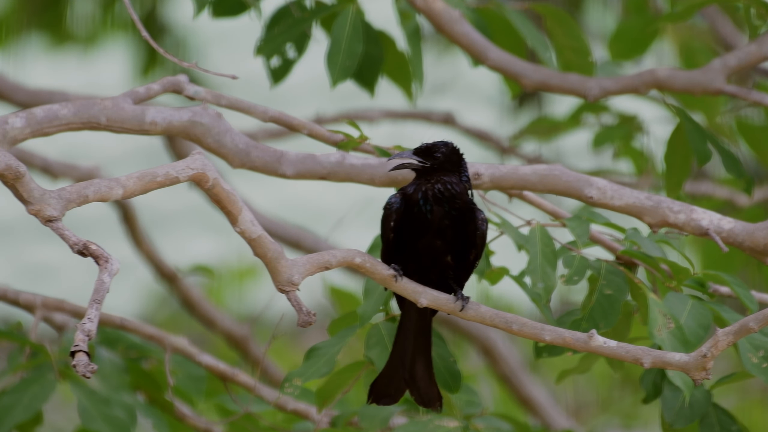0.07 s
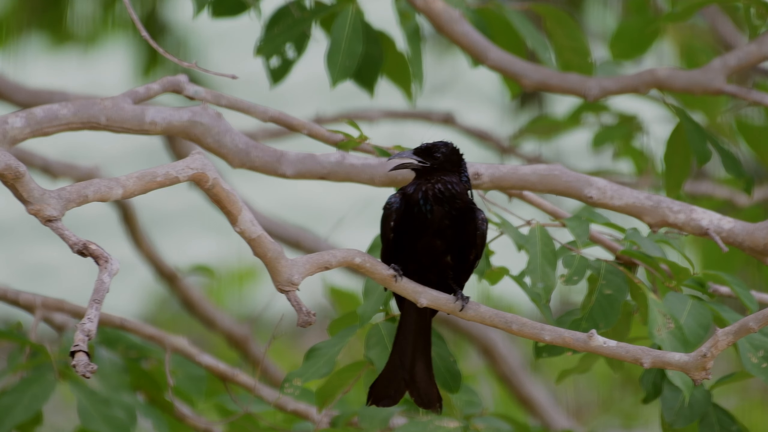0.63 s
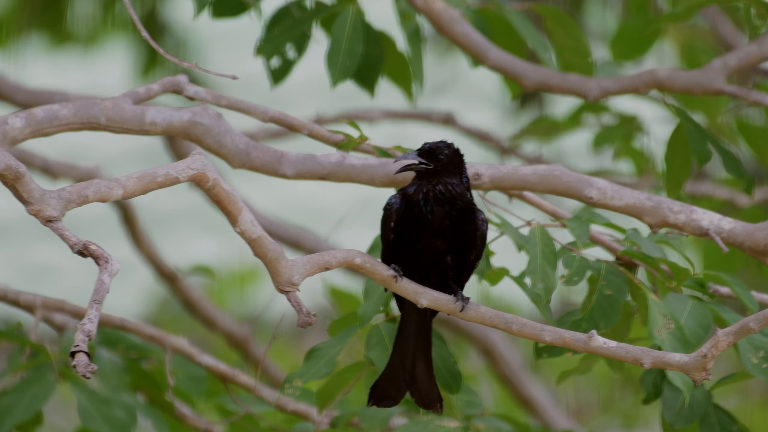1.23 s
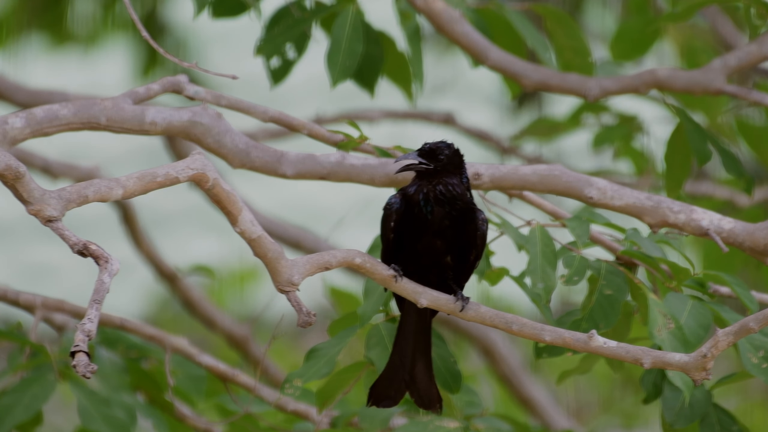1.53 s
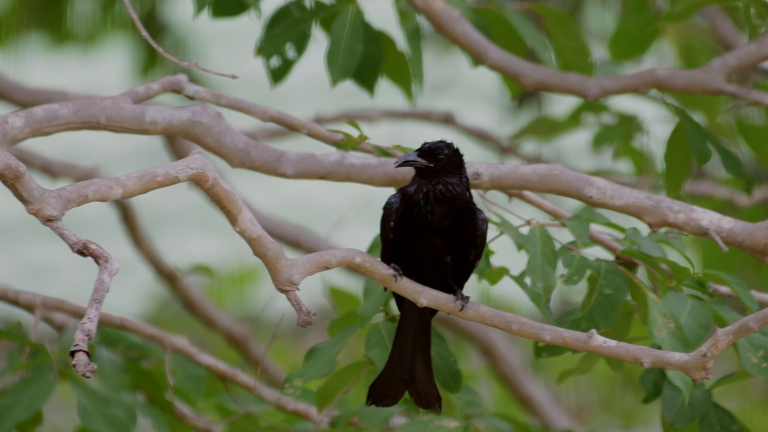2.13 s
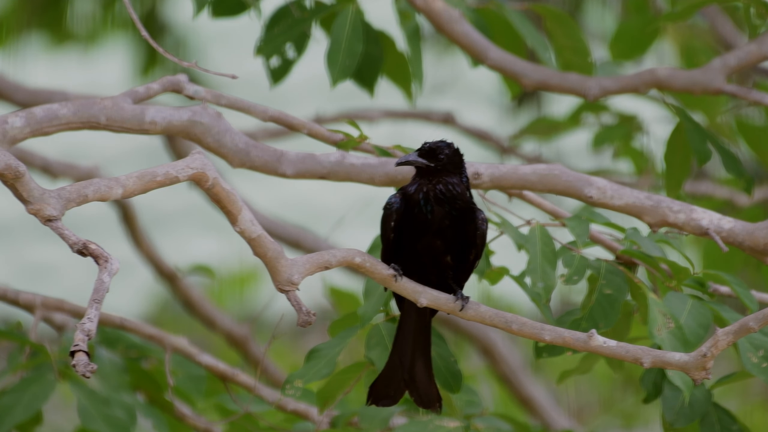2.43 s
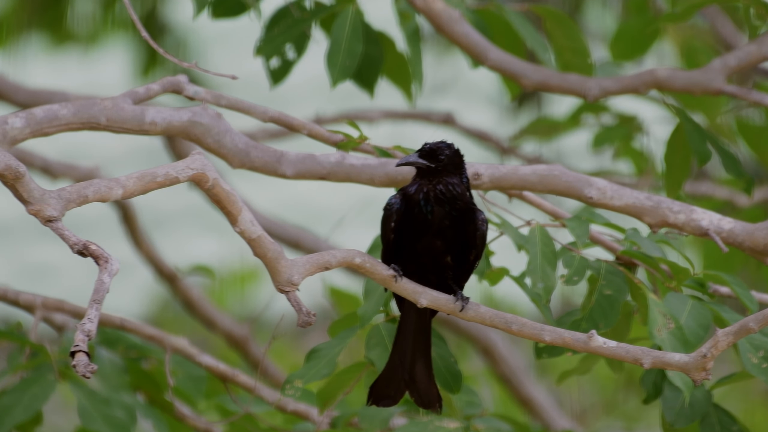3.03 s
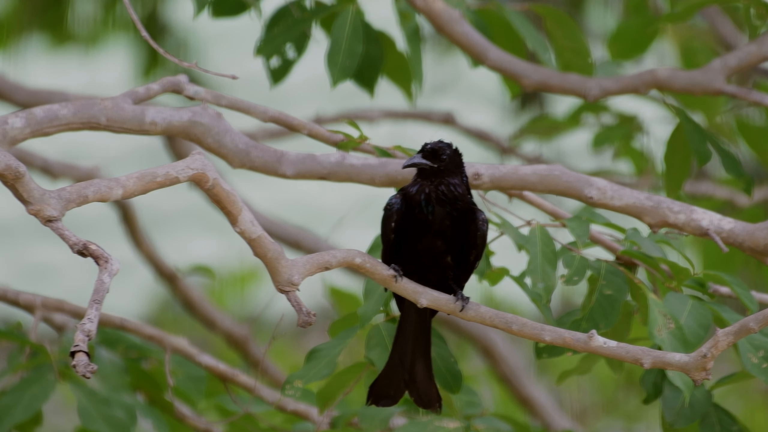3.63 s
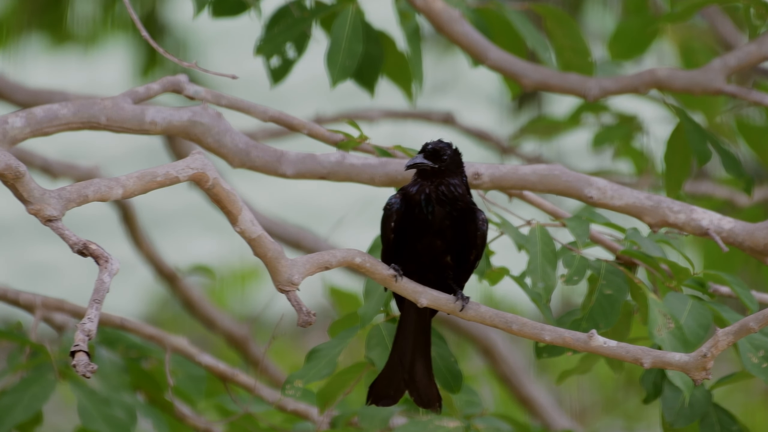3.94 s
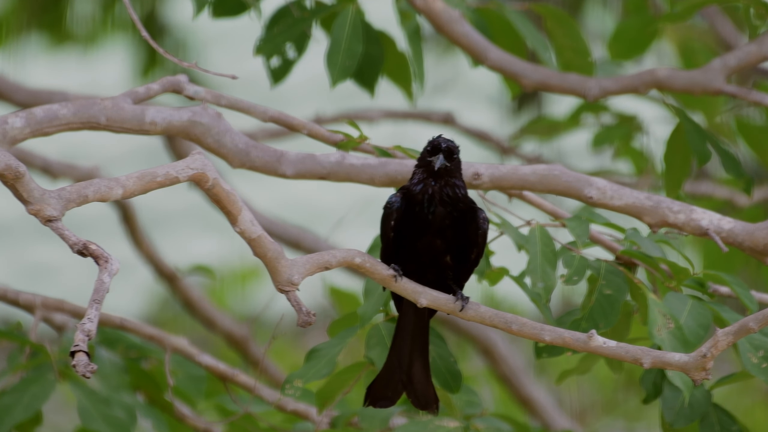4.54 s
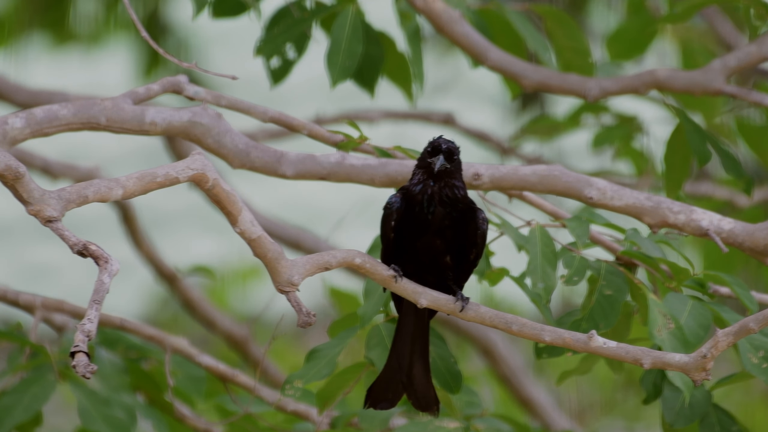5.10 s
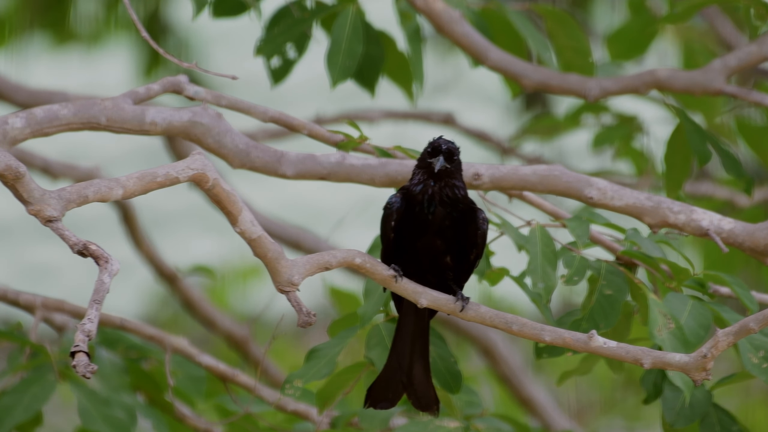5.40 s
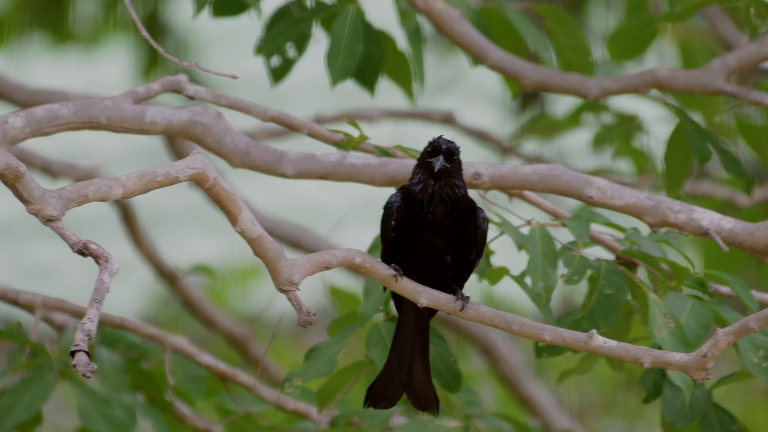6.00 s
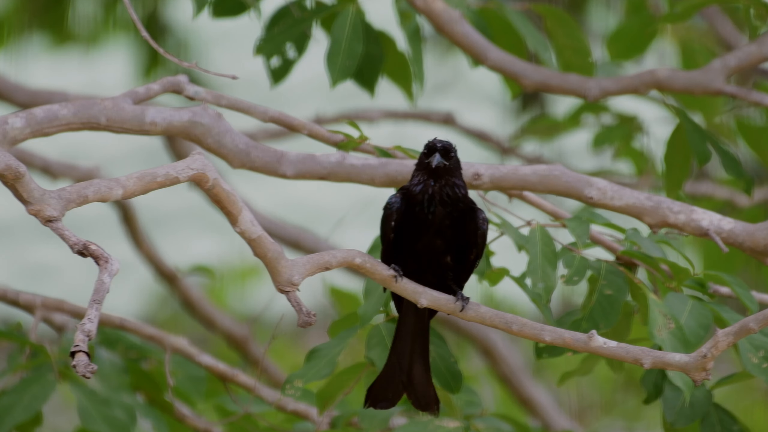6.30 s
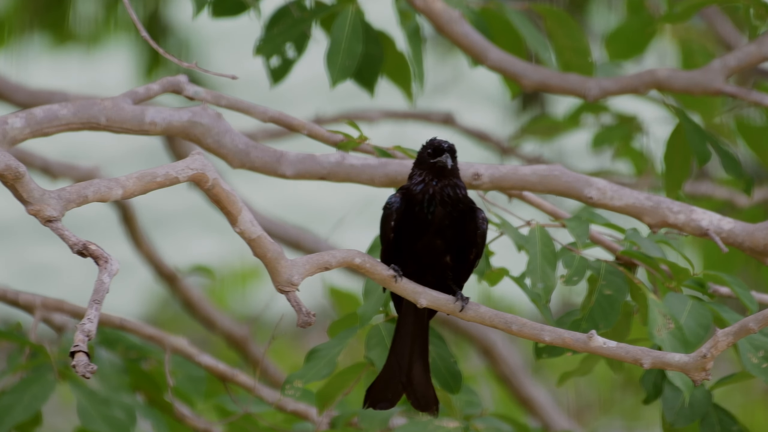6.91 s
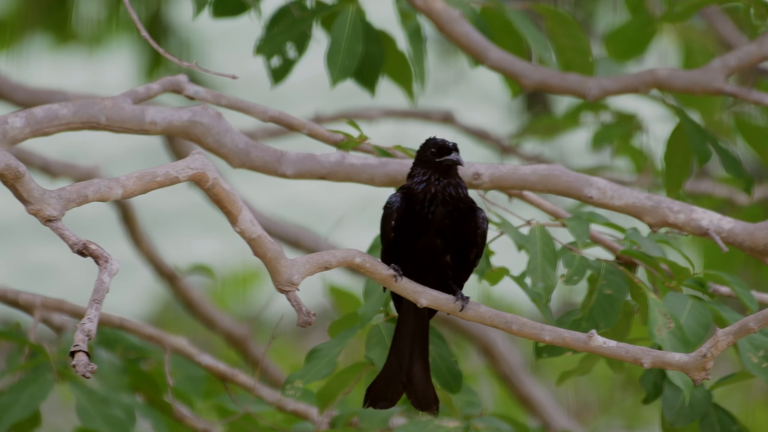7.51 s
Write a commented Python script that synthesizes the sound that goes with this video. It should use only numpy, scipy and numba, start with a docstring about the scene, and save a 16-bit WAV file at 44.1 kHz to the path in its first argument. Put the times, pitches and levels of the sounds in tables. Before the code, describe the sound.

Outdoors, a nearby bird whistles, clinks and rasps above high insects and far chirps, until everything cuts to a faint hush.

```python
"""In a garden, a drongo (a songbird) gives short pips, rising whistles, metallic clinks and harsh rasps
that scatter among the trees. Its voice organ makes the clear notes; fluttering air makes the rasps.
Insects hold a thin high tone, farther birds add low chirps, quick chips and falling whistles,
and a few soft taps sound nearby. Near the end it all cuts to a much quieter outdoor hush
that slowly swells, with a few faint birds in it."""
import sys
import numpy as np
from scipy import signal
from scipy.fft import rfft, irfft, next_fast_len
from scipy.io import wavfile
from scipy.ndimage import uniform_filter1d
from numba import njit

SR = 44100
rng = np.random.default_rng(int(sys.argv[2]) if len(sys.argv) > 2 else 0)


def waveform_to_disk(signal):
    """Save audio, clipped to [-1, 1], as 16-bit WAV at the path in sys.argv[1]."""
    frames = np.transpose(np.atleast_2d(signal))
    scaled = np.clip(frames, -1, 1) * 32767
    samples = np.round(scaled).astype(np.int16)
    wavfile.write(sys.argv[1], SR, samples)


N = 341775
TIME = np.arange(N) / SR

# tone of the garden air: (frequency [Hz], relative level [dB])
AIR_TONE = [(25, -23), (70, 3), (110, -5), (165, -2), (200, -9), (320, -4.5), (400, -10.5), (700, -14.5),
            (1500, -11), (2700, -6.5), (3300, 0.5), (5500, -9), (7500, -26.5), (15500, -26.5)]
# how alike the air is in both ears: (frequency [Hz], likeness [0 to 1])
AIR_LIKENESS = [(60, 1), (160, 1), (330, 0.69), (800, 0), (2000, 0.28), (8000, 0)]
# insect loudness: (time [s], chorus level [dB], nearest insect compared with the chorus [dB])
INSECT_LEVELS = [(0, -48, -21), (1.1, -47.5, -1.5), (2.5, -50.5, -17), (3.7, -49.5, -9.5), (4.5, -49, 0),
                 (5.1, -49, -2.5), (6, -50, -39), (6.9, -49, -10.5)]
# tone of the insect chorus: (frequency [Hz], relative level [dB])
INSECT_TONE = [(3000, -22), (4100, -14.5), (4550, 1.5), (4780, 4), (4950, -4.5), (5120, -15.5),
               (6000, -26.5), (7500, -30.5), (8800, -55.5), (9600, -27), (10400, -50.5)]

# the drongo's pips: (time [s], length [s], level [dB], left minus right [dB])
PIPS = [(-.07, 0.065, -27, -2), (0.14, 0.063, -24.5, -2), (2.825, 0.058, -23.5, -3),
        (3.053, 0.061, -24, -3)]
# its long rising whistles: (time [s], length [s], pitch [Hz], level [dB])
WHISTLES = [(0.427, .25, 3031, -20), (3.85, .259, 3044, -19.5)]
# thin squeaks that lead into a clink: (time [s], level [dB])
SQUEAKS = [(1.539, -32.5), (2.577, -45.5), (3.399, -39), (5.232, -31)]
# clinks: (time [s], pitch [Hz], level [dB], early slide [octaves/s], overtone boost [dB],
# left minus right [dB])
CLINKS = [(1.565, 3290, -22, -1.35, 3.5, -1), (2.6, 3052, -22.5, -0.04, 1.5, -5),
          (3.424, 3030, -24.5, -0.19, 1, -3), (5.259, 3130, -25.5, -3, 3, -1.5),
          (6.018, 3204, -22.5, -0.2, -0.5, -1)]
# the path of one short steep whistle: (time [s], pitch [Hz], level [dB])
UPSWEEP = [(6.265, 2455, -46), (6.303, 2710, -39), (6.308, 2770, -29), (6.333, 2935, -31.5),
           (6.36, 3139, -17.5), (6.377, 3536, -21.5), (6.388, 4210, -23.5), (6.406, 3820, -49)]
# the pure tones in a clink or pip: (multiple of the pitch, level [dB])
CLINK_PARTIALS = [(1, 3.5), (2, -8), (3, -17.5), (4, -28), (5, -33)]
# the pure tones in a whistle: (multiple of the pitch, level [dB])
WHISTLE_PARTIALS = [(1, 2), (2, -17.5), (3, -25), (4, -36)]
# the beak favours some overtones: (frequency [Hz], boost [dB])
BEAK_BOOST = [(9500, 0), (11000, 4.5), (12250, 5), (13400, 7.5), (15500, 1.5)]
# the drongo turns its head and its highest sounds dull: (time [s], treble change [dB])
HEAD_TURN = [(4.3, 0), (4.7, -3.5)]
# the treble that this turn dulls: (frequency [Hz], gain [dB])
TOP_OCTAVE = [(9000, -39), (11500, 4)]

# rasps: (time [s], length [s], level [dB], hiss [dB], when the beak is most closed [share of length])
RASPS = [(1.748, 0.19, -26.5, -11.5, 0.35), (2.105, 0.2, -26, -13.5, 0.43), (5.44, 0.21, -27, -13.5, 0.31)]
# tone of a rasp's main sound: (frequency [Hz], relative level [dB])
RASP_BODY = [(600, -59), (780, -20), (1000, -9), (1450, -1.5), (2400, -1), (3400, -2), (4300, -7.5),
             (5200, -11.5), (8000, -37), (11800, -38.5), (15500, -50)]
# tone of the drongo's hiss: (frequency [Hz], relative level [dB])
HISS_TONE = [(3500, -20), (5000, 5.5), (6500, 4.5), (8000, -1), (9700, -8.5), (11000, -14), (15500, -41.5)]
# thin sizzle through the nearly closed beak: (frequency [Hz], relative level [dB])
RASP_SIZZLE = [(8500, -27.5), (10500, -9), (12200, 5.5), (13800, -10), (15500, -11.5)]

# groups of far low chirps: (first time [s], last time [s], number of chirps, level [dB])
CHIRP_GROUPS = [(0.126, 0.302, 2, -56), (0.748, 1.403, 3, -57.5), (2.81, 3.458, 3, -57.5),
                (3.273, 3.871, 3, -58.5), (4.396, 4.878, 4, -58.5), (5.092, 5.261, 2, -58.5),
                (6.366, 6.811, 3, -61.5)]
# soft taps: (time [s], level [dB], pitch [Hz])
TAPS = [(0.425, -50.5, 545), (1.082, -50.5, 690), (1.891, -47, 580), (2.449, -42.5, 642)]
# runs of far quick chips: (time [s], number of chips, level [dB])
CHIP_RUNS = [(.447, 2, -46.5), (0.801, 1, -43), (1.004, 3, -49.5), (1.306, 3, -48), (2.557, 1, -44.5),
             (2.8, 3, -47), (3.1, 3, -45), (3.705, 3, -47)]
# far falling whistles: (time [s], level [dB])
FALLS = [(.832, -47.5), (1.625, -43.5), (2.64, -42.5), (3.395, -41.5), (4.237, -43.5), (4.897, -40.5),
         (5.724, -42), (6.455, -40)]

# tone of the hush: (frequency [Hz], relative level [dB])
HUSH_TONE = [(30, -22), (70, -11), (160, -6.5), (420, -13.5), (900, -16), (1500, -13), (2300, -12.5),
             (3400, -15.5), (5000, -20), (6700, -17), (10000, -26), (15000, -36)]
# narrow bands missing from the hush: (low edge [Hz], high edge [Hz])
HUSH_GAPS = [(2400, 2730), (7200, 8000)]
# the hush grows louder: (time [s], level [dB])
HUSH_SWELL = [(6.93, -70), (7.38, -69.5), (7.75, -55.5)]
# faint birds in the hush: (time [s], length [s], first pitch [Hz], last pitch [Hz], level [dB])
FAINT_BIRDS = [(6.97, 0.2, 4100, 3810, -71), (7.094, 0.26, 1350, 1480, -71), (7.6, 0.26, 3440, 3580, -55)]


def from_db(db):
    """Turn decibels into a number to multiply by."""
    return 10 ** (np.asarray(db) / 20)


def unit_power(x):
    """Scale a sound so that its average power is one."""
    return x / np.sqrt(np.mean(x ** 2) + 1e-20)


def in_time(rows, t):
    """Read a table's columns at times t, joining its rows with straight lines."""
    s, *columns = np.transpose(rows)
    return [np.interp(t, np.sort(s), c) for c in columns]


def per_frequency(points, size=N):
    """Read a table at every frequency in a sound's spectrum."""
    hz, value = np.transpose(points)
    return np.interp(np.log(np.arange(size // 2 + 1) * SR / size + 1), np.log(hz), value)


def equalise(x, tone):
    """Turn each frequency up or down as a table says."""
    size = x.shape[-1]
    return irfft(rfft(x) * from_db(per_frequency(tone, size)), size)


def colour(x, tone):
    """Give a sound a table's tone, at a power of one."""
    return unit_power(equalise(x, tone))


def drift(per_s, size=N):
    """A random wander around zero that picks per_s new values a second."""
    return np.interp(np.arange(size) / SR * per_s, np.arange(size), rng.standard_normal(size))


def empty_track():
    """Stereo silence with spare room for echoes."""
    return np.zeros((2, next_fast_len(N + 2 * SR)))


def add(track, start_s, sound):
    """Mix a sound into a track; any part before time zero wraps to the far end."""
    where = round(start_s * SR) + np.arange(sound.shape[-1])
    track[..., where % track.shape[-1]] += sound


def pan(db):
    """Left and right gains; positive db leans left."""
    return from_db([[db / 2], [-db / 2]])


def delay_left(pair, lag_ms):
    """Sound reaches the left ear later than the right (earlier if the lag is negative)."""
    delay = np.exp(-2j * np.pi * np.arange(N // 2 + 1) * SR / N * lag_ms / 1000)
    return np.array([irfft(rfft(pair[0]) * delay, N), pair[1]])


def progress(length_s):
    """Seconds since a note began (t), and the share of it that has passed (u)."""
    t = np.arange(int(length_s * SR)) / SR
    return t, t / t[-1]


def envelope(t, attack_s, release_s, rise_db, fade_db):
    """A note's loudness: a quick start, a middle that changes by rise_db, then a fade."""
    held_s = t[-1] - release_s
    db = rise_db * np.minimum(t / held_s - 1, 0) - fade_db * np.maximum(t - held_s, 0) / release_s
    return np.minimum(t / attack_s, 1) * from_db(db)


def step(u, at, width):
    """A smooth step from near 0 to near 1."""
    return .5 + np.arctan((u - at) / width) / np.pi


def droop(u, after, depth):
    """The pitch sags as the breath runs out at the end of a note."""
    return 1 - depth * np.clip((u - after) / (1 - after), 0, 1) ** 2


def note(hz, gain, partials=((1, 0),), waver=0.0048, side_db=0, top_hz=10500, effort=0):
    """A bird's voice organ makes a tone with overtones; the beak muffles those above top_hz."""
    i = np.arange(len(hz))
    hz = hz * (1 + waver * drift(900, len(i)))
    phase = 2 * np.pi * np.cumsum(hz) / SR
    soft_ends = np.clip(np.minimum(i, i[-1] - i) / SR / 0.0011, 0, 1)
    lowest, *overtones = [from_db(db) / (1 + (k * hz / top_hz) ** 6) * np.sin(k * phase)
                          for k, db in partials]
    # positive effort favours overtones in the loud parts, negative in the soft parts
    brightness = (gain / gain.max() + .01) ** effort
    return soft_ends * gain * (pan(side_db) * lowest + pan(-side_db / 2) * brightness * sum(overtones))


def glide(length_s, first_hz, last_hz, waver, bend=1):
    """A note that swells and fades as it slides; a bend below one slides early."""
    _, u = progress(length_s)
    return note(first_hz * (last_hz / first_hz) ** (u ** bend), np.sqrt(4 * u * (1 - u)), waver=waver)


def echoes(per_s=1600):
    """One second of separate, unevenly spaced echoes."""
    out = np.zeros(SR)
    arrivals = (np.arange(per_s) + rng.random(per_s)) * SR / per_s
    out[arrivals.astype(int)] = rng.choice([-1, 1], per_s)
    return unit_power(out)


def trees(pair, near_db, far_db, alike, near_t60=0.77, far_t60=0.56, build_s=0.00017):
    """Echoes from close branches and the trees beyond; a t60 is the seconds taken to fade by 60 dB."""
    t = np.arange(SR) / SR
    both_ears, each_ear = echoes(), np.array([echoes(), echoes()])
    reflections = np.sqrt(alike) * both_ears + np.sqrt(1 - alike) * each_ear
    build_up = 1 - np.exp(-(t / build_s) ** 2)
    near, far = [unit_power(from_db(-60 * t / t60) * build_up) for t60 in (near_t60, far_t60)]
    response = reflections * np.hypot(from_db(near_db) * near, from_db(far_db) * far) / np.sqrt(SR)
    return irfft(rfft(pair) * rfft(response, pair.shape[-1]), pair.shape[-1])


def garden_air():
    """Steady background noise, the same in both ears only in the bass."""
    mid, side = rfft(rng.standard_normal((2, N)))
    alike = per_frequency(AIR_LIKENESS)
    pair = irfft(np.sqrt(1 + alike) * mid + np.sqrt(1 - alike) * side * [[1], [-1]], N)
    return from_db(-55.5) * colour(pair, AIR_TONE)


def insects(pitch_hz=4925, sag=0.028, strokes_per_s=27.5):
    """The nearest insect's uneven strokes each rise and dip in pitch, over a blurred chorus."""
    chorus_db, nearest_db = in_time(INSECT_LEVELS, TIME)
    stroke = np.cumsum(strokes_per_s * (1 + .11 * drift(20))) / SR % 1
    hz = pitch_hz * (1 - sag * (1 - stroke / .6) ** 2 + .006 * drift(300))
    phase = 2 * np.pi * np.cumsum(hz) / SR
    tone = np.sin(phase) + from_db(-36.5) * np.sin(2 * phase)
    nearest = from_db(4 * drift(24)) * np.sin(np.pi * stroke) * tone
    chorus = colour(rng.standard_normal((2, N)), INSECT_TONE) * from_db(2 * drift(60))
    return from_db(chorus_db) * (from_db(nearest_db) * unit_power(nearest) + chorus)


def pip(length_s, side_db, low_hz=2765, high_hz=3086):
    """A soft, hoarse low start steps up to a louder, cleaner note, then droops."""
    t, u = progress(length_s)
    upper = step(u, at=0.36, width=0.077)
    pitch = (low_hz + (high_hz - low_hz) * upper) * droop(u, after=0.705, depth=0.11)
    gain = envelope(t, attack_s=0.0061, release_s=0.017, rise_db=6, fade_db=13)
    clear = note(pitch, gain, CLINK_PARTIALS, waver=0.0043, side_db=side_db, top_hz=8800)
    return clear + from_db(-19) * gain * (1 - upper) * hoarse_tones(pitch)


def hoarse_tones(hz):
    """Strong and weak vibrations take turns, adding rough tones midway between the overtones."""
    phase = 2 * np.pi * np.cumsum(hz * (1 + 0.01 * drift(900, len(hz)))) / SR
    return sum(from_db(-7.5 * k) * np.sin((k + .5) * phase) for k in range(1, 5))


def opening_hiss(level_db=-53, t60=0.27):
    """A brief rough hiss at the start of each pip and clink."""
    bursts = empty_track()
    for s, *_ in CLINKS + PIPS:
        add(bursts, s, from_db(level_db - 60 * TIME[:SR // 4] / t60))
    return bursts[:, :N] * colour(rng.standard_normal(N), HISS_TONE)


def chirp(low_hz=1020, high_hz=2060, croak_hz=(1300, 2450)):
    """A call that jumps up an octave and breaks into a breathy croak, never quite the same twice."""
    hoarseness, tuning = rng.uniform(.25, .7), rng.uniform(.92, 1.08)
    t, u = progress(rng.uniform(.055, .09))
    upper = step(u, at=.3, width=0.1)
    pitch = (low_hz + (high_hz - low_hz) * upper) * tuning
    voiced = note(pitch, np.ones(len(t)), [(1, 2.3), (2, 3.1)], waver=.12 * upper, top_hz=3600)
    band = signal.butter(3, croak_hz, "band", fs=SR, output="sos")
    croak = unit_power(signal.sosfilt(band, rng.standard_normal(len(t))))
    breathy = hoarseness * upper
    gain = envelope(t, attack_s=0.0046, release_s=0.032, rise_db=7.5, fade_db=17.5)
    return gain * (np.sqrt(1 - breathy) * voiced + np.sqrt(breathy) * croak)


def taps(t60=0.042):
    """Small dull knocks: a short ring with a puff of noise."""
    out, t = empty_track(), np.arange(SR // 8) / SR
    for s, db, hz in TAPS:
        band = signal.butter(2, [0.87 * hz, 2 * hz], "band", fs=SR, output="sos")
        puff = unit_power(signal.sosfilt(band, rng.standard_normal(len(t))))
        add(out, s, from_db(db - 60 * t / t60) * (np.sin(2 * np.pi * hz * t) + from_db(-0.5) * puff))
    return out[:, :N]


def rising_whistle(length_s, hz, scoop_s=0.016, scoop_hz=494.6, climb_hz=190, leap_hz=1593):
    """A whistle that scoops up to its pitch, climbs slowly, then leaps high."""
    t, u = progress(length_s)
    pitch = hz - scoop_hz * np.exp(-t / scoop_s) + climb_hz * u + leap_hz * step(u, at=.84, width=.041)
    gain = envelope(t, attack_s=0.037, release_s=0.05, rise_db=5, fade_db=10.5)
    return note(pitch, gain, WHISTLE_PARTIALS, top_hz=9100, effort=-0.38)


def chip():
    """A tiny high call that slides down."""
    return glide(0.029, first_hz=4680, last_hz=4030, waver=0.008, bend=1.7)


def falling_whistle(swell_db=5, break_db=22):
    """A long slide down that grows louder, the voice breaking off for a moment on the way."""
    sound = glide(.126, first_hz=6950, last_hz=2870, waver=0.0077, bend=0.94)
    u = np.linspace(0, 1, sound.shape[-1])
    voice_break = np.exp(-((u - 0.44) / .085) ** 2)
    return sound * from_db(swell_db * (u - .5) - break_db * voice_break)


def squeak(high_hz=6000, low_hz=4400):
    """A thin note that starts faint and high, then grows as it drops towards the clink."""
    t, u = progress(0.033)
    pitch = high_hz + (low_hz - high_hz) * step(u, at=0.59, width=0.0793)
    gain = envelope(t, attack_s=.004, release_s=0.0064, rise_db=22.5, fade_db=9.5)
    return note(pitch, gain, [(1, 7.5), (2, -16)], waver=0.023)


def clink(hz, slide, bright_db, side_db, length_s=0.063, hold_s=0.0252, settle_s=0.0032):
    """A metallic note that starts a little high, settles on a ringing pitch and droops away."""
    t, u = progress(length_s)
    early_slide = 2 ** (slide * np.minimum(t - hold_s, 0))
    overshoot = 1 + 0.071 * np.exp(-t / settle_s)
    pitch = hz * early_slide * overshoot * droop(u, after=hold_s / length_s, depth=0.17)
    partials = [(k, db + bright_db * (k > 1)) for k, db in CLINK_PARTIALS]
    gain = envelope(t, attack_s=0.0063, release_s=0.026, rise_db=-0.5, fade_db=24)
    return note(pitch, gain, partials, side_db=side_db, top_hz=10900, effort=0.21)


def rasp_movements(muffle_db=16):
    """Partway through a rasp the beak closes and muffles the hiss; the throat tightens as it reopens."""
    gain, closed, tight, hiss_db = np.zeros((4, N))
    for s, length, db, open_hiss_db, closed_at in RASPS:
        t, u = progress(length)
        width = np.where(u < closed_at, 0.13, 0.23)   # shuts faster than it opens
        closing = np.exp(-np.abs((u - closed_at) / width) ** 3)
        shape = envelope(t, attack_s=0.014, release_s=0.047, rise_db=9, fade_db=6.5)
        add(gain, s, from_db(db - 3.4 * closing) * shape)
        add(closed, s, closing)
        add(tight, s, step(u, at=closed_at + 0.2, width=0.079))
        add(hiss_db, s, open_hiss_db - muffle_db * closing)
    return gain, np.minimum(closed, 1), tight, hiss_db


@njit
def resonance(x, hz, width_hz):
    """Ring like a hollow space, keeping the sound near a pitch that can move."""
    y, r = np.zeros(len(x)), np.exp(-np.pi * width_hz / SR)
    for i in range(2, len(x)):
        ringing = 2 * r * np.cos(2 * np.pi * hz[i] / SR) * y[i - 1] - r * r * y[i - 2]
        y[i] = (1 - r * r) / 2 * (x[i] - x[i - 2]) + ringing
    return y


def drongo_rasps(flutter_hz=420, throat_low_hz=1550, throat_high_hz=3355, beak_hz=3370):
    """Air torn by an uneven flutter rings in the throat, which climbs to a shrill end, and the beak."""
    gain, closed, tight, hiss_db = rasp_movements()
    throat_hz = throat_low_hz + (throat_high_hz - throat_low_hz) * tight
    flutter = np.cos(2 * np.pi * np.cumsum(flutter_hz * (1 + 0.2965 * drift(400))) / SR)
    air = rng.standard_normal(N) * np.exp(.34 * flutter)
    body = colour(air, RASP_BODY)
    throat = from_db(9.5) * resonance(body, throat_hz, width_hz=780)
    shrill = from_db(12) * tight ** 2 * resonance(body, throat_hz, width_hz=280)
    breath = colour(rng.standard_normal(N), RASP_BODY)
    beak = from_db(11) * (1 - closed) * resonance(breath, np.full(N, beak_hz), width_hz=650)
    voice = body + throat * np.maximum(closed, tight) + shrill + beak
    # steady air pressure holds the level even
    voice /= np.sqrt(uniform_filter1d(voice ** 2, int(.01 * SR)) + 1e-12)
    sizzle = from_db(-25.5) * closed * colour(air, RASP_SIZZLE)
    hiss = from_db(hiss_db) * colour(air, HISS_TONE)
    out = empty_track()
    add(out, 0, pan(-0.8) * from_db(-0.5) * gain * (voice + sizzle + hiss))
    return (out + trees(out, near_db=-0.5, far_db=-5, alike=0.045, near_t60=0.2, far_t60=0.79))[:, :N]


def head_turn(voice):
    """The highest sounds go where the beak points, so they dull as the bird turns."""
    top_db, = in_time(HEAD_TURN, TIME)
    return voice + (from_db(top_db) - 1) * equalise(voice, TOP_OCTAVE)


def upsweep():
    """One short whistle that shoots steeply upward."""
    start, end = UPSWEEP[0][0], UPSWEEP[-1][0]
    t, _ = progress(end - start)
    hz, db = in_time(UPSWEEP, start + t)
    return note(hz, from_db(db), WHISTLE_PARTIALS, top_hz=7350, effort=-0.74)


def hush():
    """Quiet swelling air and faint birds, both louder on the right but a touch earlier on the left."""
    out, air = empty_track(), colour(rng.standard_normal(N), HUSH_TONE)
    for edges_hz in HUSH_GAPS:
        air = signal.sosfilt(signal.butter(3, edges_hz, "bandstop", fs=SR, output="sos"), air)
    add(out, 0, from_db(in_time(HUSH_SWELL, TIME)[0]) * air)
    for s, length, first_hz, last_hz, db in FAINT_BIRDS:
        _, u = progress(length)
        add(out, s, from_db(db) * glide(length, first_hz, last_hz, waver=0.036) * np.sin(np.pi * u))
    return delay_left(pan(-5) * out[:, :N], lag_ms=-0.19)


def mix_drongo_notes():
    """The drongo's clear notes pass through its beak and scatter among the trees."""
    out = empty_track()
    for s, length, db, side_db in PIPS:
        add(out, s, from_db(db) * pip(length, side_db))
    for s, length, hz, db in WHISTLES:
        add(out, s, from_db(db) * rising_whistle(length, hz))
    for s, db in SQUEAKS:
        add(out, s, from_db(db) * squeak())
    for s, hz, db, slide, bright_db, side_db in CLINKS:
        add(out, s, from_db(db) * clink(hz, slide, bright_db, side_db))
    add(out, UPSWEEP[0][0], upsweep())
    out = equalise(out, BEAK_BOOST)
    echo = trees(out, near_db=-6.5, far_db=-8, alike=0.048, near_t60=0.17, far_t60=0.73, build_s=0.0043)
    return (out + echo)[:, :N]


def mix_far_birds():
    """Distant callers; their chirps and falling whistles arrive mostly as echoes."""
    chirps, chips, falls = empty_track(), empty_track(), empty_track()
    for first, last, count, db in CHIRP_GROUPS:
        for s in np.linspace(first, last, round(count)):
            add(chirps, s, from_db(db) * chirp())
    for s, count, db in CHIP_RUNS:
        for k in range(round(count)):   # 48 ms apart
            add(chips, s + k * 0.048, from_db(db - rng.uniform(0, 2)) * chip())
    for s, db in FALLS:
        add(falls, s, from_db(db) * falling_whistle())
    falls *= from_db(drift(70, falls.shape[-1]))   # the far whistles flicker
    high_echo = trees(falls + from_db(-13) * chips, near_db=-7.5, far_db=3, alike=0.49)
    low_echo = trees(chirps, near_db=3, far_db=-5, alike=0.24, near_t60=0.29)
    return (chips + from_db(-1.5) * (falls + chirps) + high_echo + low_echo)[:, :N]


def scene(cut_s=6.909, fade_s=0.018):
    """The garden, then a sudden change to the hush."""
    drongo = delay_left(head_turn(mix_drongo_notes() + opening_hiss() + drongo_rasps()), lag_ms=0.11)
    garden = garden_air() + insects() + drongo + mix_far_birds() + taps()
    before_cut = np.clip((cut_s - TIME) / fade_s + .5, 0, 1)
    return before_cut * garden + (1 - before_cut) * hush()


def record(dry):
    """A steep filter removes the very highest treble, above 15800 Hz."""
    return signal.sosfilt(signal.ellip(12, .1, 80, 15800, fs=SR, output="sos"), dry)


dry = scene()
out = record(dry)
waveform_to_disk(out)
```